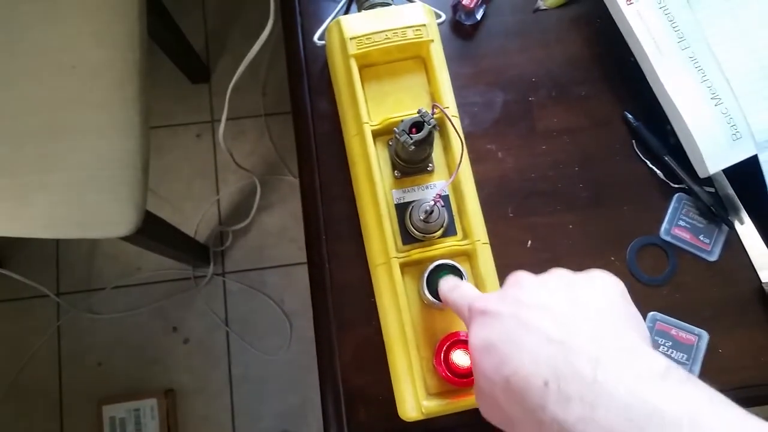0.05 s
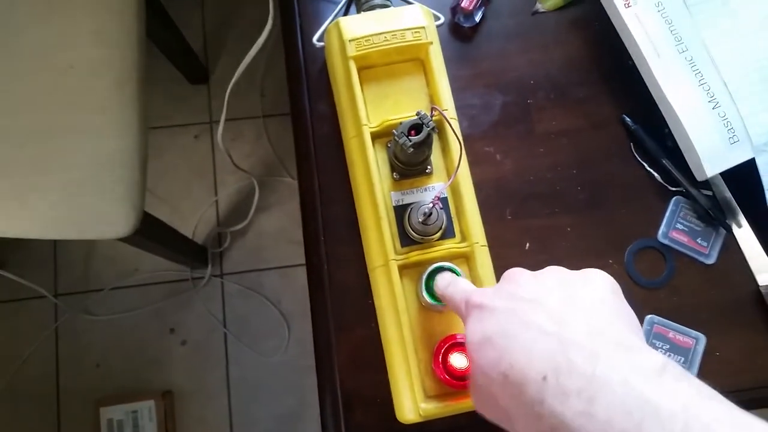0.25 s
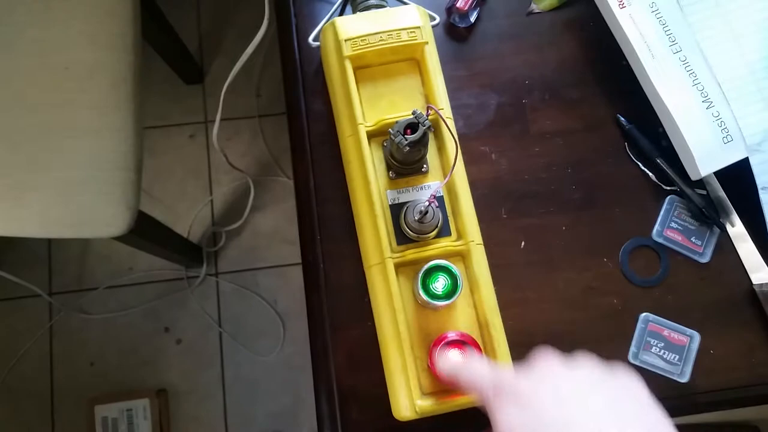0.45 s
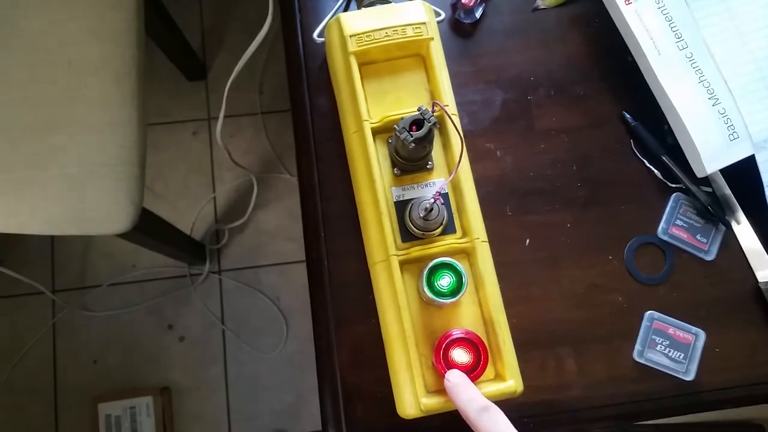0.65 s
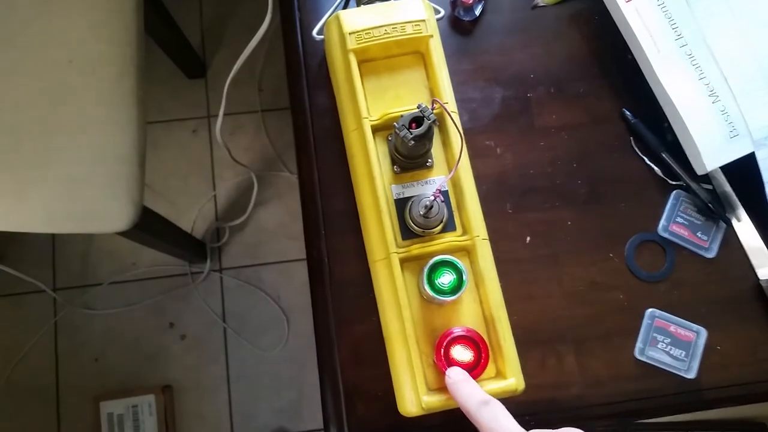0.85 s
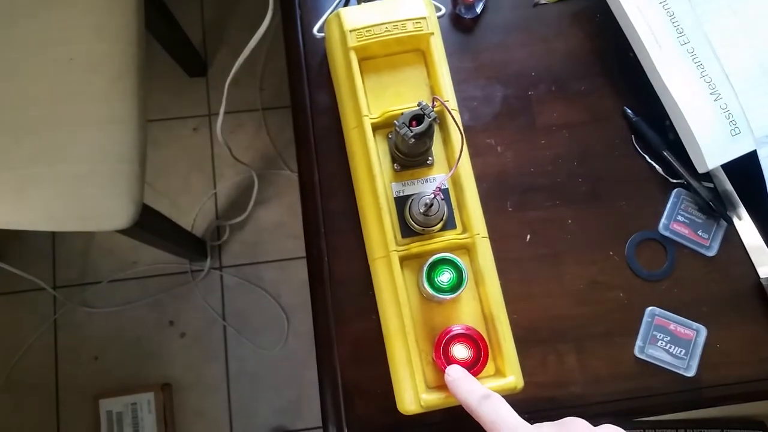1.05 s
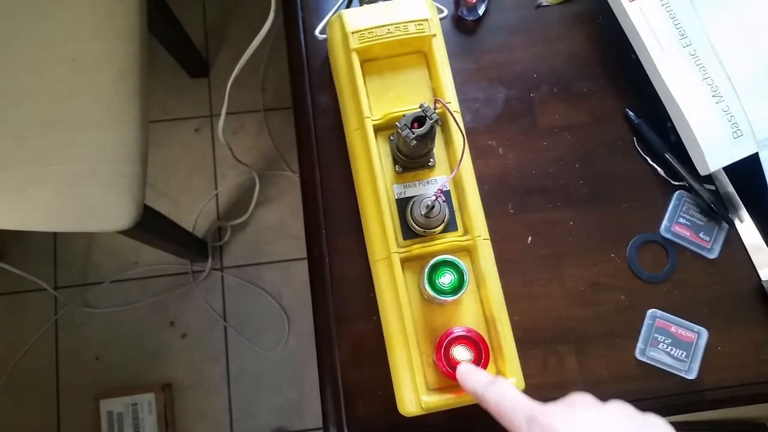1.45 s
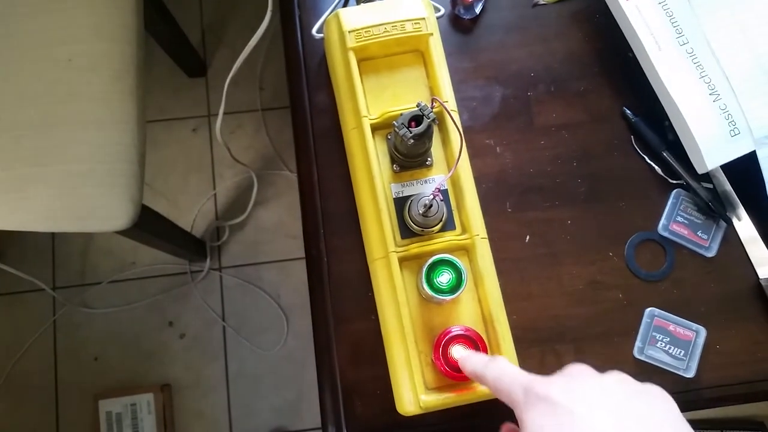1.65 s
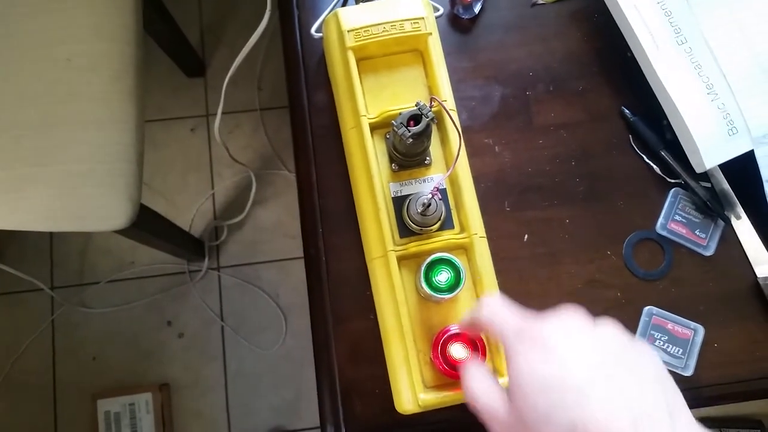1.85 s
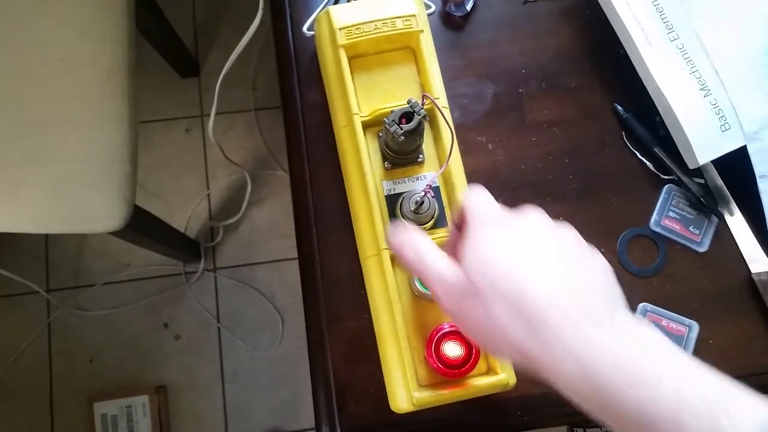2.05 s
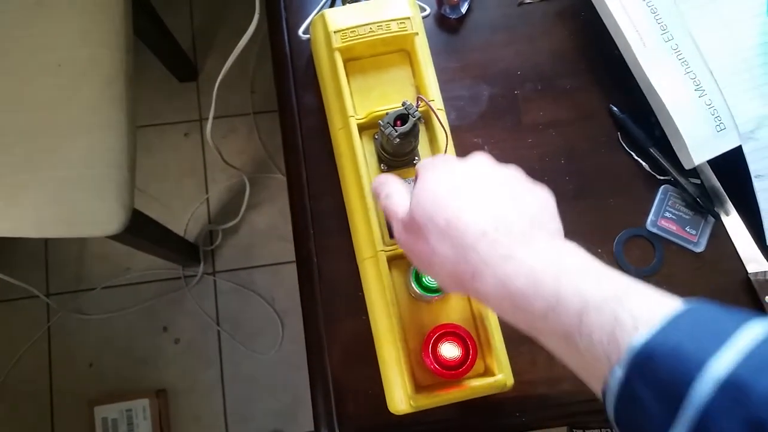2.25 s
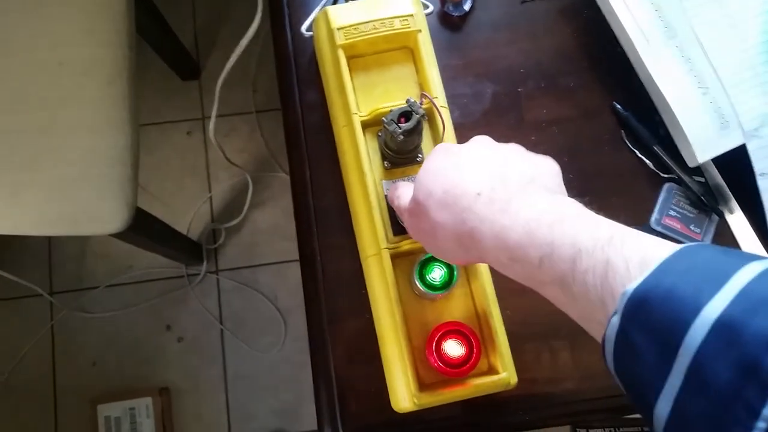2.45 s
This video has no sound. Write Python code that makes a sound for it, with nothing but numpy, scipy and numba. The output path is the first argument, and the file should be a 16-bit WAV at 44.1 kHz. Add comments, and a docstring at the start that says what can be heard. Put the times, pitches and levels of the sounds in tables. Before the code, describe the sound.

A contactor slams shut with one loud metallic bang, then a faint electrical buzz.

```python
"""Over the rumble and hum of a small hard room, a plastic push button clicks and closes a large contactor on
the left: its armature scrapes in, slams and bounces, and the steel frame and the room ring on. The bang thumps
the microphone and pulls the automatic gain down, so a soft bump and the snap of the button's spring come
ducked. As the gain creeps back, the room's hum returns and the magnet's mains buzz swells, while a sleeve
rustles softly as the hand moves. Last, a hand knocks on the plastic button box."""
import sys
import numpy as np
from scipy import signal
from scipy.fft import rfft, irfft
from scipy.io import wavfile
from scipy.ndimage import uniform_filter1d, minimum_filter1d
from numba import njit

SR = 44100
rng = np.random.default_rng(int(sys.argv[2]) if len(sys.argv) > 2 else 0)


def unload_wav(signal):
    """Save mono or channel-first audio to the path in sys.argv[1] as 16-bit WAV at rate SR, clipped to [-1, 1]."""
    wavfile.write(
        sys.argv[1],
        SR,
        np.round(np.clip(np.atleast_2d(signal).T, -1, 1) * 32767).astype(np.int16),
    )


N = 110250
T = np.arange(N) / SR

# colour of the room's rumble and hiss (frequency [Hz], left [dB], right [dB])
ROOM_COLOUR = [(20.4, -28.5, -35.5), (41.6, -13, -23.5), (81, -21, -32), (160, -34.5, -32.5),
               (237, -32.5, -35.5), (340, -32, -34.5), (536, -40, -43), (900, -43.5, -52), (1360, -50, -57),
               (2040, -58, -63.5), (3470, -60.5, -69.5), (4500, -62.5, -74), (5600, -63, -75.5),
               (6800, -58.5, -76), (7250, -69.5, -81.5), (8400, -81.5, -88), (9300, -86, -83.5),
               (10500, -77.5, -77), (15600, -70, -69.5)]
# hum lines (frequency [Hz], level [dB])
HUM_LINES = [(119, -61.5), (156, -55.5), (177, -62), (240.5, -58), (346, -63.5)]
# button clicks and knocks on the box (time [s], level [dB], t60 [s], top treble [dB], box ring [dB])
BUTTON_TAPS = [(0.2028, 4, 0.024, 9.5, -17), (0.2112, -1, .035, 5, -16), (2.3175, 5, .04, -20, 3.5),
               (2.328, -6, 0.082, -18, 3), (2.438, -11.5, .07, 6, 7.5), (2.447, 0.5, 0.051, 8, -1.5)]
# colour of the plastic (frequency [Hz], left [dB], right [dB])
PLASTIC_COLOUR = [(200, -41, -42), (500, -40.5, -42.5), (719.8, -30, -41), (900, -38, -50),
                  (1320, -36.5, -56), (2715, -40, -58), (4600, -48, -64.5), (6996, -39, -70),
                  (8450, -66.5, -74.5), (13500, -63.5, -67)]
# modes of the button box (frequency [Hz], level [dB], t60 [s])
BOX_MODES = [(684, 1, 0.1), (1226, -9.5, .1), (1640, -2.5, 0.027), (2150, -9, 0.082), (2620, -9.5, .08)]
# the armature's slam and bounces (time [s], relative level [dB], t60 [s])
ARMATURE_BLOWS = [(0.2379, 12.5, 0.03), (0.2408, -3.5, .03), (0.253, -2.5, 0.01), (0.272, -3, 0.0069)]
# colour of a blow (frequency [Hz], left [dB], right [dB])
CRACK_COLOUR = [(209, -38, -39), (600, -15, -33.5), (896, -26, -41), (1460, -12, -16.5), (2250, -25.5, -34),
                (2700, -9.5, -32), (3000, -13.5, -33.5), (3600, -29, -37), (4010, -15, -34),
                (4400, -6.5, -26), (5505, -11, -35), (5900, -19.5, -34.5), (6350, -10, -37.5),
                (7700, -17.5, -37), (9500, -29.5, -31.5), (12100, -27, -24.5), (13900, -24.5, -23),
                (15600, -29.5, -27.5)]
# colour of the ringing enclosure and room (frequency [Hz], left [dB], right [dB])
CLANG_COLOUR = [(200, -56, -57.5), (499.7, -49, -50.5), (833.5, -44, -50.5), (1200, -23, -32.5),
                (1540, -16, -26), (1970, -18, -34.5), (2300, -22, -35), (2580, -18, -32),
                (3500, -21.5, -38), (4200, -17.5, -35), (4500, -13, -36), (6040, -17.5, -41),
                (6840, -13, -43.5), (7560, -18.5, -41.5), (8860, -26.5, -33.5), (9500, -32.5, -28),
                (13800, -31.5, -31), (15600, -32.5, -33.5)]
# modes of the steel frame (frequency [Hz], relative level [dB])
FRAME_MODES = [(1637, -4.5), (2019, -6), (2562, -8), (2832, -7), (4236, -5.5), (4335, -2.5), (4432, -8.5),
               (4609, 0), (4743, -4), (4863, -3), (5213, -6.5), (5961, -7.5), (6528, -1.5), (6582, -4.5),
               (7459, -4.5), (7666, -6.5)]
# colour of the room's longer, lower ring (frequency [Hz], left [dB], right [dB])
BOOM_COLOUR = [(40, 5, -3.5), (150, -1, -4.5), (350, -2, -5.5), (700, -6, -9.5), (1200, -6, -13),
               (2500, -19.5, -27), (6000, -40, -49.5)]
# modes of the magnet (frequency [Hz], relative level [dB], t60 [s])
MAGNET_MODES = [(4335, -12.5, .035), (4624, -13, .02), (6365, -12, 0.063), (7030, 2, .013), (7252, 4, .018)]
# colour of the magnet's rattle (frequency [Hz], relative level [dB])
RATTLE_COLOUR = [(3700, -28.5), (4400, -4), (5700, -12.5), (6500, -4.5), (7400, 1), (7900, -27),
                 (8300, -48)]
# soft bumps of the hand on the box (time [s], body level [dB], body t60 [s], thud level [dB])
HAND_BUMPS = [(0.374, -21.5, 0.048, 0), (0.607, -50, 0.063, -23.5), (2.335, -37, .28, -26.5)]
# colour of the spring's snap (frequency [Hz], left [dB], right [dB])
SPRING_COLOUR = [(300, -52, -56), (800, -49, -58), (1500, -46, -62), (2800, -42, -62), (4600, -41, -68),
                 (6600, -45, -73), (9000, -60, -74), (13500, -75, -78)]
# colour of the sleeve's rustle (frequency [Hz], left [dB], right [dB])
LATE_HISS_COLOUR = [(100, -49.5, -48), (610, -45.5, -48.5), (1370, -46, -60), (2650, -53, -62),
                    (4550, -59, -77), (7800, -55, -84.5), (8760, -85.5, -88.5), (9500, -84, -77.5),
                    (10650, -69, -64.5), (15600, -70, -70)]

BANG_S, BANG_GAIN_DB = 0.2392, 32


def undb(db):
    return 10 ** (np.asarray(db) / 20)


def unit_rms(x):
    return x / np.sqrt(np.mean(x ** 2))


def pan(db):
    """Stereo gains that put the left side db above the right."""
    return undb(np.array([[db], [-db]]) / 2)


def noise():
    return rng.standard_normal((2, N))


def colour(x, table):
    """EQ through a table's (frequency, level) points, with one curve or one per side."""
    hz, *sides = np.array(table, float).T
    log_hz = np.log(np.maximum(np.fft.rfftfreq(N, 1 / SR), 1))
    return irfft(rfft(x) * undb([np.interp(log_hz, np.log(hz), db) for db in sides]), N)


def lowpass(x, hz, order=2):
    """Low-pass without delay."""
    return signal.sosfiltfilt(signal.butter(order, hz, fs=SR, output="sos"), x)


def strike(start, t60, rise=.0005, hold=0):
    """Envelope: linear attack, hold, exponential decay."""
    age = T - start
    return np.clip(age / rise, 0, 1) * np.exp(-np.log(1000) * np.maximum(age - rise - hold, 0) / t60)


def ring(hz, start, t60):
    """One damped mode."""
    return np.sin(2 * np.pi * hz * (T - start)) * strike(start, t60)


def drift(hz):
    """Slow random modulation with a spread near 1."""
    step = int(SR / hz)
    return uniform_filter1d(np.repeat(rng.standard_normal(N // step + 2), step), step)[:N]


def room_tone():
    """A bed of rumble and hiss, alike on both sides in the upper bass, with wavering hum lines."""
    upper_bass = lambda x: lowpass(x, 606) - lowpass(x, 108)
    air, mono_share = noise(), .8
    centre = np.sqrt(mono_share) * upper_bass(rng.standard_normal(N))
    air = air + (np.sqrt(1 - mono_share) - 1) * upper_bass(air) + centre
    hum = sum(undb(db + 2 * drift(9)) * np.sqrt(2) * np.sin(2 * np.pi * hz * T + .8 * drift(8.7))
              for hz, db in HUM_LINES)
    return colour(air, ROOM_COLOUR) + hum * pan(1)


def button_taps():
    """Plastic clicks and knocks ring the box's modes and leave a short room tail."""
    plastic = colour(noise(), PLASTIC_COLOUR)
    dull = lowpass(plastic, 8200, order=6)
    clicks = box = 0
    for start, db, t60, top_db, box_db in BUTTON_TAPS:
        tone = dull + undb(top_db) * (plastic - dull)
        room_tail = undb(-12) * strike(start, t60=.39)
        clicks += undb(db) * tone * (strike(start, t60) + room_tail)
        for hz, mode_db, mode_t60 in BOX_MODES:
            box += undb(db + box_db + mode_db) * ring(hz, start, mode_t60)
    return clicks + box * undb(-54) * pan(12.5)


def armature():
    """The armature scrapes faintly as it slides in, lands with a crack and bounces."""
    scrape = undb(-44) * strike(start=.2303, t60=.02, hold=.006)
    blows = sum(undb(db) * strike(start, t60, rise=.0016) for start, db, t60 in ARMATURE_BLOWS)
    return colour(noise(), CRACK_COLOUR) * (scrape + blows)


def bang_tail(t60):
    """Envelope of whatever the slam sets ringing."""
    return strike(BANG_S, t60, rise=.0018, hold=.061)


def enclosure_clang():
    """Enclosure and room ring as a noisy wash: the top dies first, a faint late tail lingers."""
    wash = colour(noise(), CLANG_COLOUR)
    body = lowpass(wash, 6700, order=4)
    body_decay = bang_tail(t60=.32) + undb(-44) * bang_tail(t60=1.2)
    return undb(1) * (body * body_decay + (wash - body) * bang_tail(t60=.24))


def frame_ring():
    """The struck steel frame rings in bright modes, far to the left."""
    modes = sum(undb(db) * np.sin(2 * np.pi * (hz * T + rng.random((2, 1)))) for hz, db in FRAME_MODES)
    return modes * bang_tail(t60=.38) * undb(-44.5) * pan(20)


def room_boom():
    """The room answers the slam with a longer, darker ring."""
    return colour(noise(), BOOM_COLOUR) * undb(-42.5) * bang_tail(t60=1)


def overload_thump():
    """The bang overloads the microphone with one short low thump."""
    return -ring(hz=107, start=.2398, t60=.03) * undb(3) * pan(12.5)


def magnet_buzz():
    """The closed magnet ticks at twice the mains rate, ringing its modes, with a rattle after each tick."""
    tick_hz, align_s, scatter_db = 120.01, 1.9078, 1
    swell_s, swell_db = (1.25, 1.7), (-22, 0)
    cycles = (T - align_s) * tick_hz
    times = align_s + np.arange(np.ceil(cycles[0]), np.floor(cycles[-1])) / tick_hz
    sizes = undb(scatter_db * rng.standard_normal(len(times)))
    ticks, near = np.zeros(N + 16), np.arange(16)
    for at, size in zip(times * SR, sizes):
        # a windowed sinc places each tick between samples, keeping the buzz clean
        ticks[int(at) + near] += size * np.sinc(near - 8 - at % 1) * np.hanning(16)
    ping = sum(undb(db) * ring(hz, 0, t60) for hz, db, t60 in MAGNET_MODES)
    metal = signal.fftconvolve(ticks[:N], ping)[:N]
    metal = lowpass(metal - lowpass(metal, 3890, order=4), 7550, order=14)
    rattle = colour(noise() * np.exp(-(cycles % 1) / .4), RATTLE_COLOUR)
    swell = undb(np.interp(T, swell_s, swell_db)) * (T > BANG_S)
    return (unit_rms(metal) + undb(-9) * unit_rms(rattle)) * swell * undb(-63.5) * pan(25)


def hand_bumps():
    """The hand bumps the box: one low note of its hollow body under a dull thud."""
    body_hz = 160
    thud = lowpass(noise(), 960, order=3)
    thud = thud - lowpass(thud, 310)
    return sum(undb(db) * ring(body_hz, start, t60) + undb(thud_db) * thud * strike(start, .1, rise=.0013)
               for start, db, t60, thud_db in HAND_BUMPS)


def spring_snap():
    """The button's spring snaps back with one dry click."""
    return colour(noise(), SPRING_COLOUR) * undb(25.5) * strike(start=.6048, t60=.013)


def late_hiss():
    """A soft, uneven rustle of the sleeve fades in as the hand moves."""
    start_s, rise_s = 1.61, .67
    fade_in = np.clip((T - start_s) / rise_s, 0, 1)
    return colour(noise(), LATE_HISS_COLOUR) * fade_in * undb(-1 + .57 * drift(23.4))


def scene():
    """The dry mix: the bang, the hand at the box, the sleeve's rustle, the buzz and the room."""
    bang = undb(BANG_GAIN_DB) * (armature() + enclosure_clang() + frame_ring() + room_boom())
    hand = button_taps() + hand_bumps() + spring_snap()
    return bang + overload_thump() + hand + late_hiss() + magnet_buzz() + room_tone()


@njit
def release(x, step):
    """Envelope follower: instant attack, slow release."""
    followed, level = np.empty(len(x)), 0.
    for i in range(len(x)):
        level = max(x[i], level + (x[i] - level) * step)
        followed[i] = level
    return followed


def record(dry):
    """Gain control ducks on loud sound, holds and recovers; peaks are rounded and the top is cut."""
    threshold_db, max_bass_duck_db, hold_s, release_s = -16.5, 20.5, .85, .34
    split_hz, treble_depth, ceiling, top_hz = 360, 1.543, .66, 15850
    power = uniform_filter1d(np.mean(dry ** 2, axis=0), size=64)
    over_db = np.clip(10 * np.log10(np.maximum(power, 1e-12)) - threshold_db, 0, max_bass_duck_db)
    half = int(hold_s * SR / 2)
    held_db = -minimum_filter1d(-over_db, 2 * half + 1, origin=half, mode="constant")  # peak hold
    duck_db = release(held_db, 1 / (release_s * SR))
    bass = lowpass(dry * undb(-duck_db), split_hz)
    treble = dry * undb(-duck_db * treble_depth)  # pulled down further than the bass
    treble = treble - lowpass(treble, split_hz)
    self_noise = undb(-93.5) * noise()
    rounded = ceiling * np.tanh((bass + treble + self_noise) / ceiling)
    return signal.sosfilt(signal.ellip(10, .2, 80, top_hz, fs=SR, output="sos"), rounded)


dry = scene()
out = record(dry)
unload_wav(out)
```